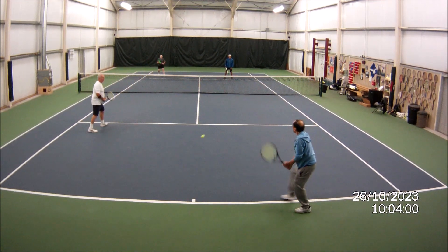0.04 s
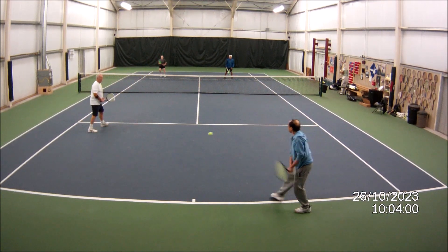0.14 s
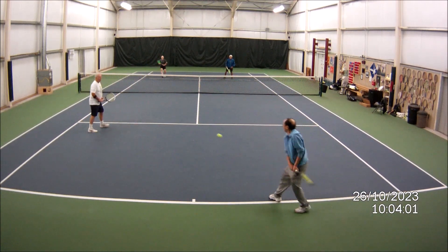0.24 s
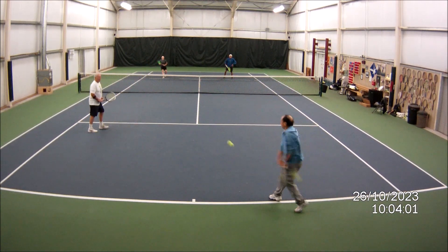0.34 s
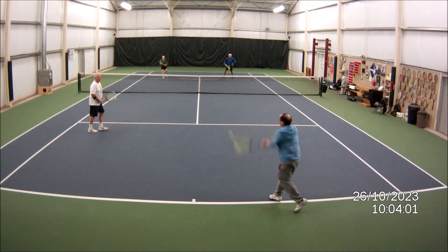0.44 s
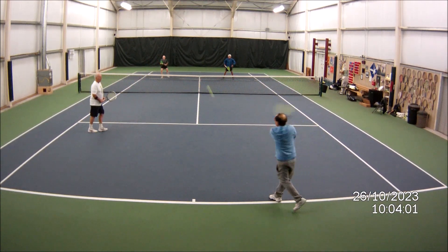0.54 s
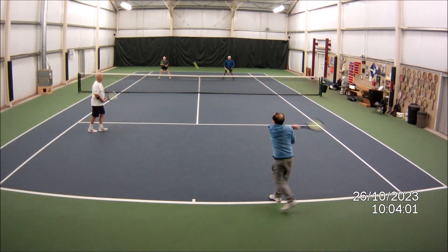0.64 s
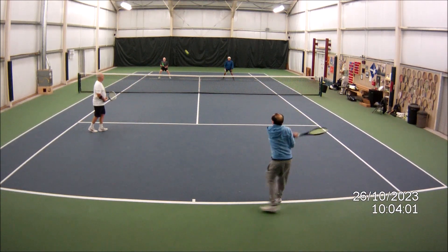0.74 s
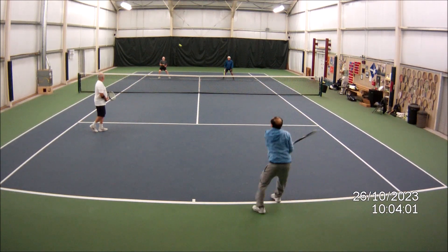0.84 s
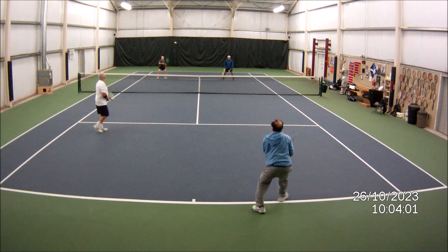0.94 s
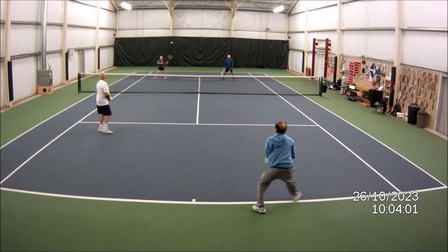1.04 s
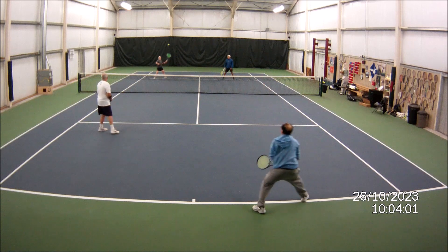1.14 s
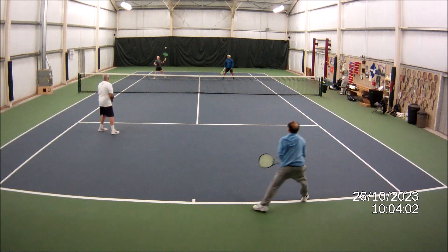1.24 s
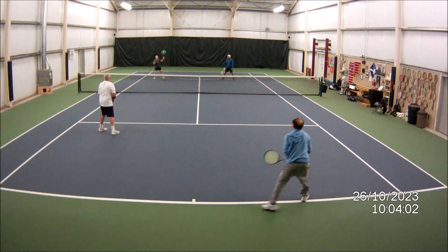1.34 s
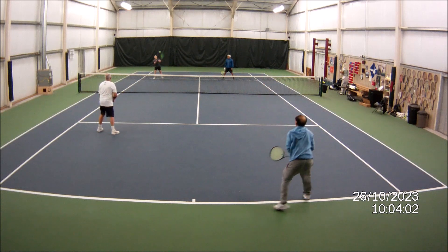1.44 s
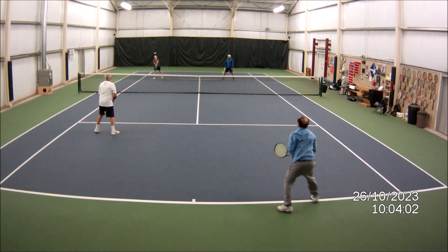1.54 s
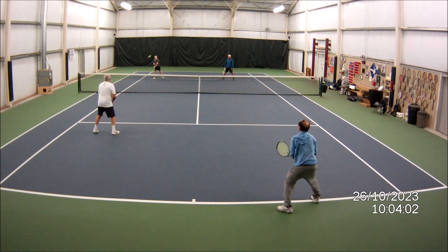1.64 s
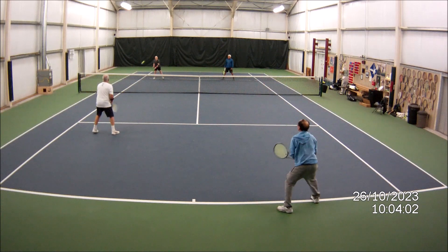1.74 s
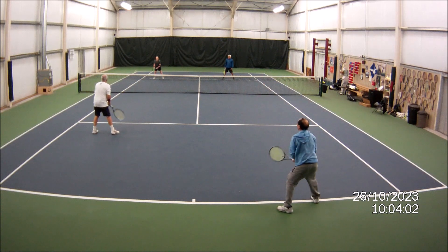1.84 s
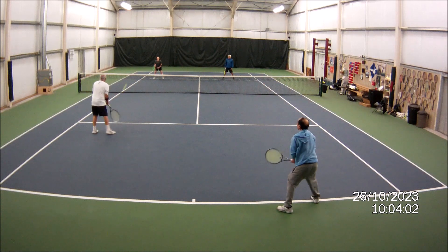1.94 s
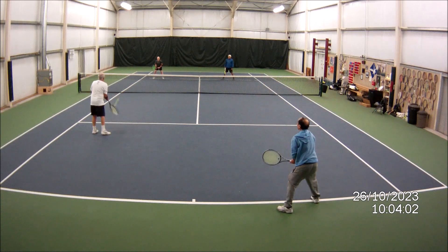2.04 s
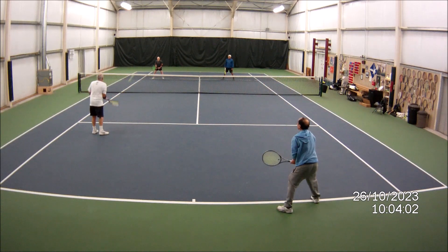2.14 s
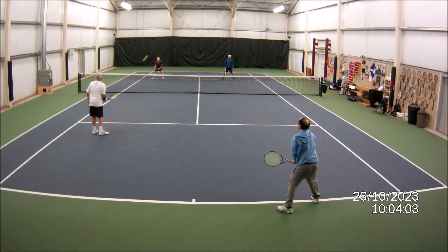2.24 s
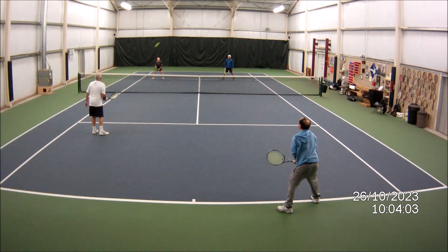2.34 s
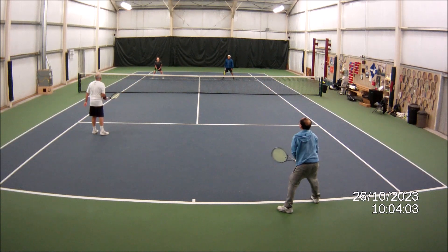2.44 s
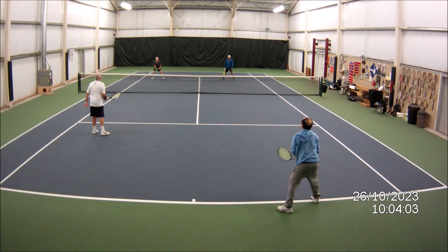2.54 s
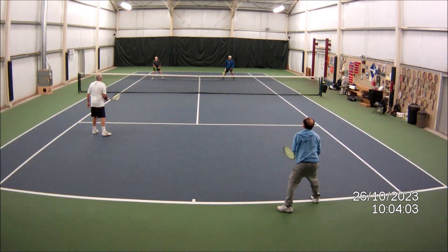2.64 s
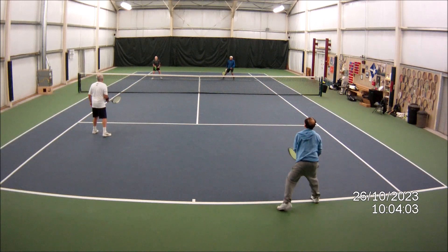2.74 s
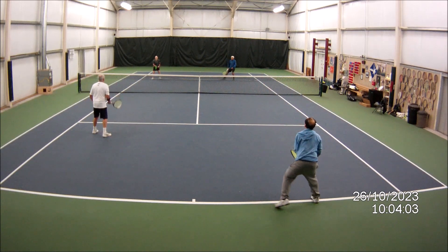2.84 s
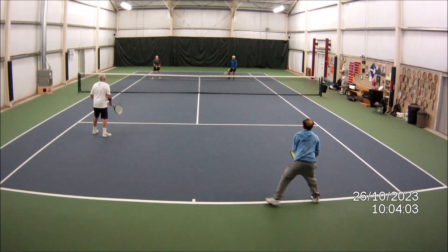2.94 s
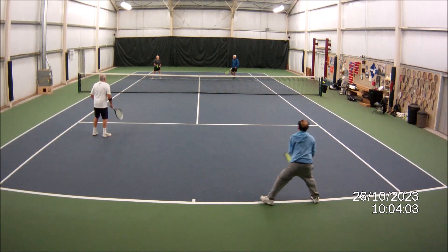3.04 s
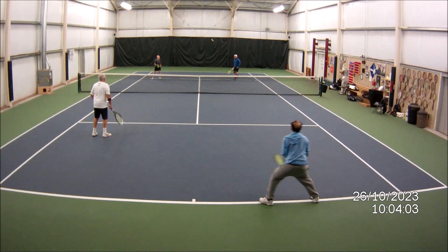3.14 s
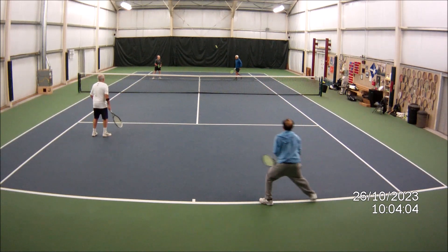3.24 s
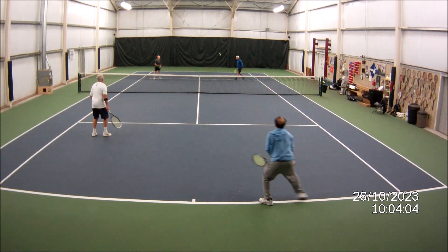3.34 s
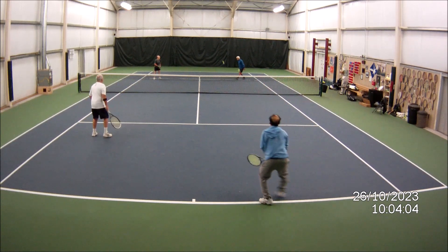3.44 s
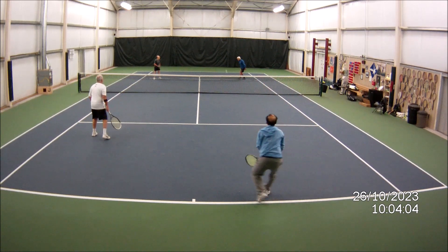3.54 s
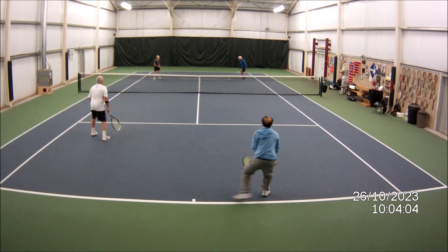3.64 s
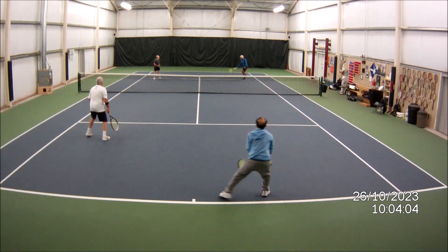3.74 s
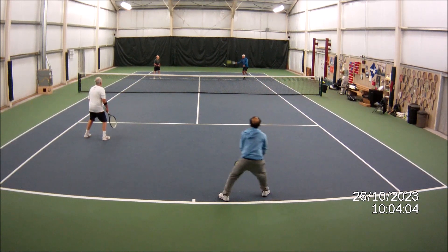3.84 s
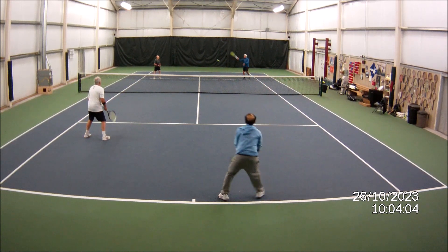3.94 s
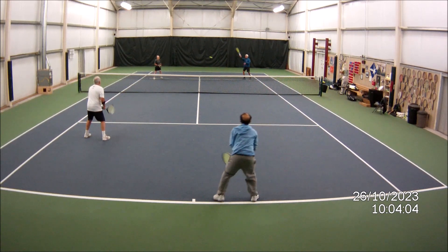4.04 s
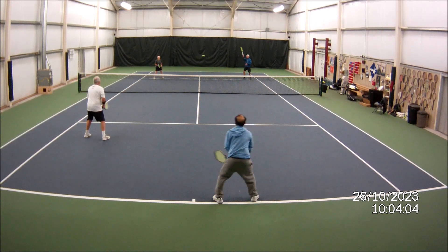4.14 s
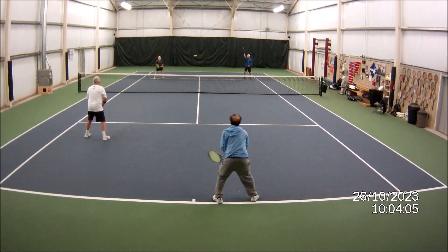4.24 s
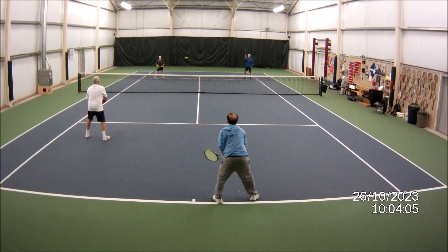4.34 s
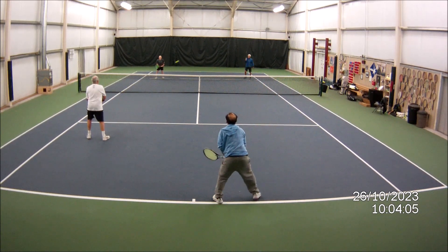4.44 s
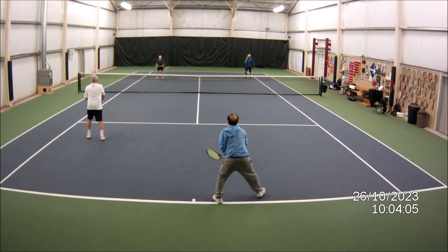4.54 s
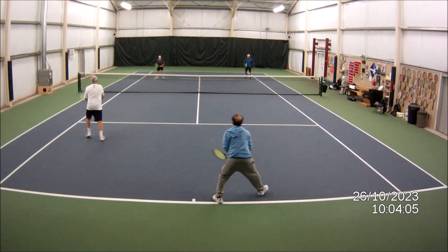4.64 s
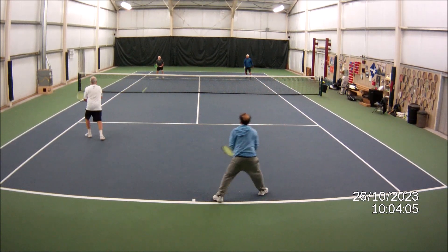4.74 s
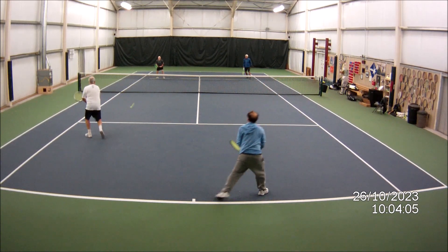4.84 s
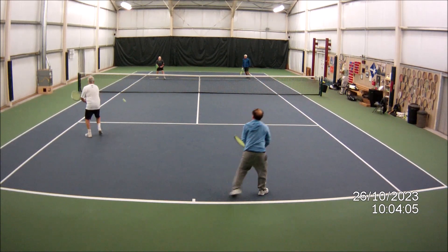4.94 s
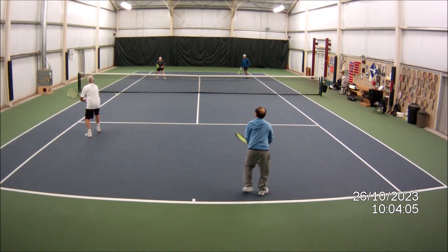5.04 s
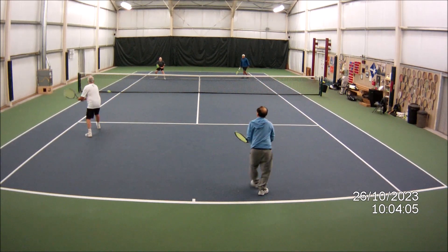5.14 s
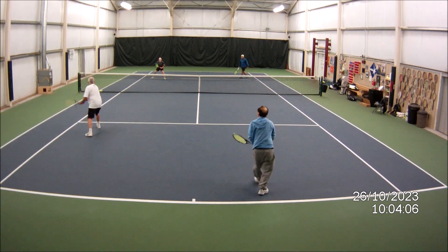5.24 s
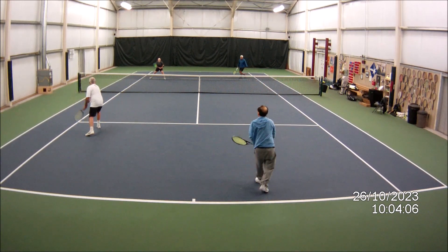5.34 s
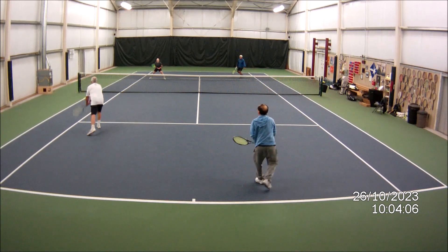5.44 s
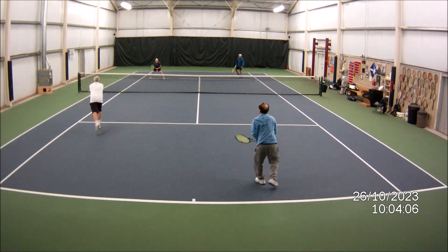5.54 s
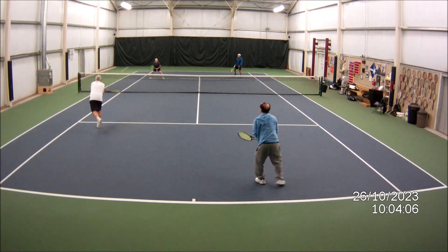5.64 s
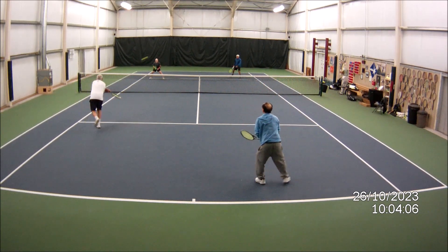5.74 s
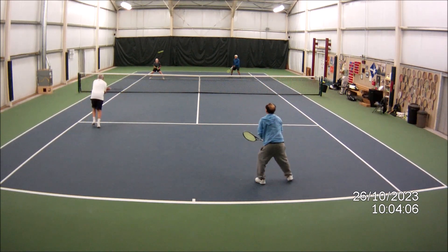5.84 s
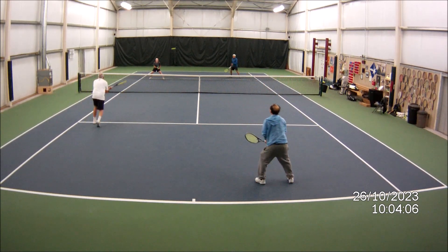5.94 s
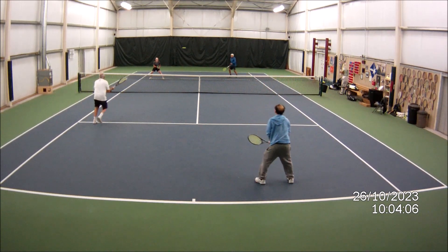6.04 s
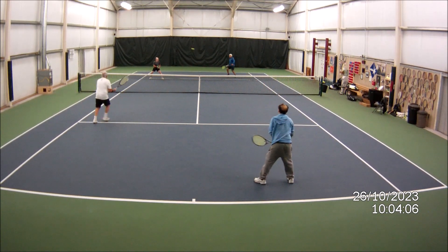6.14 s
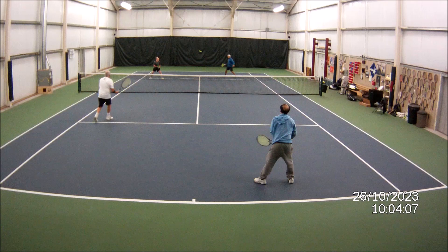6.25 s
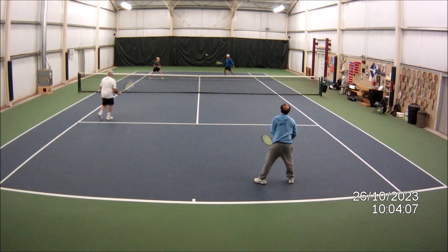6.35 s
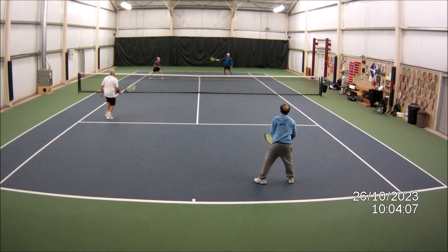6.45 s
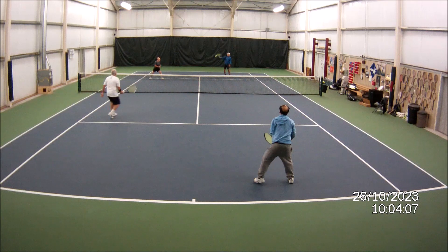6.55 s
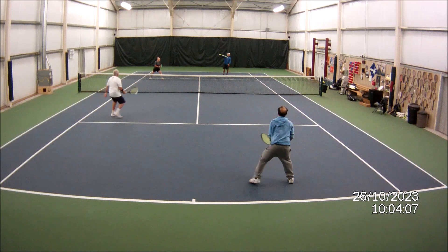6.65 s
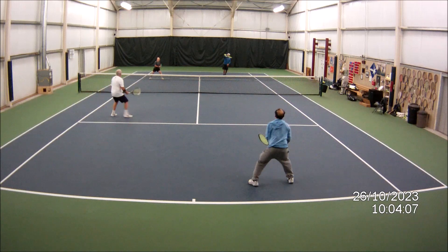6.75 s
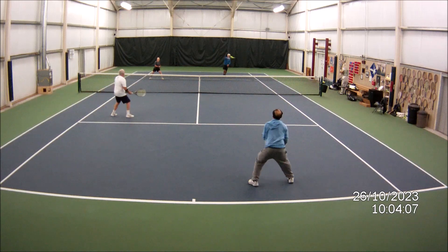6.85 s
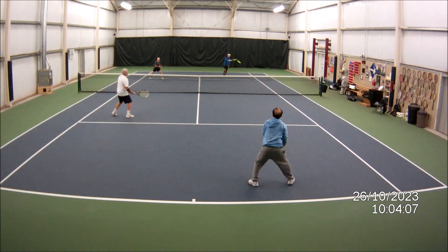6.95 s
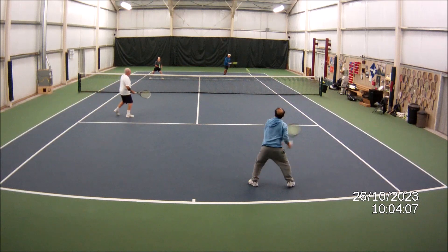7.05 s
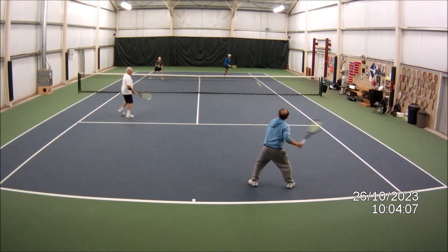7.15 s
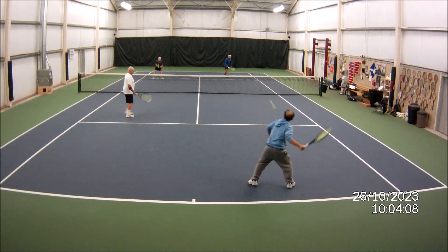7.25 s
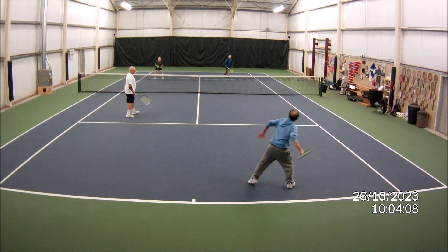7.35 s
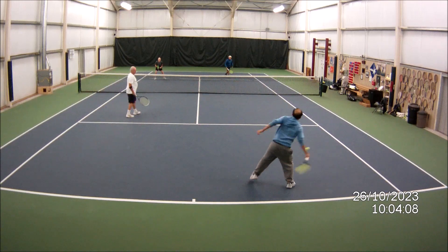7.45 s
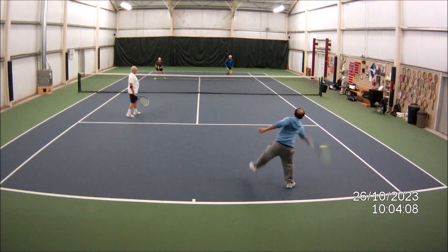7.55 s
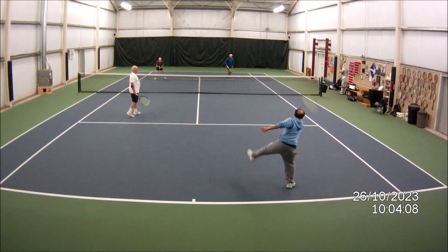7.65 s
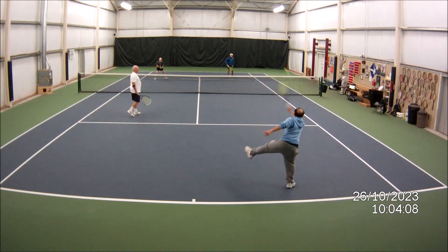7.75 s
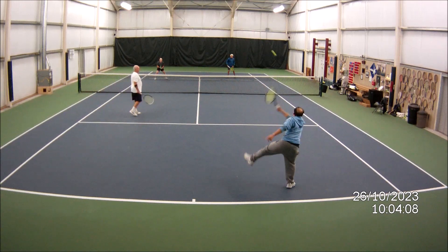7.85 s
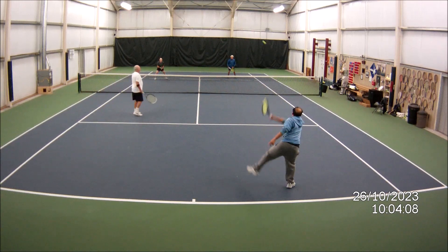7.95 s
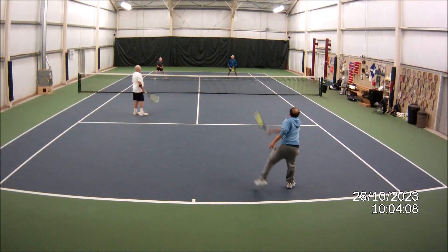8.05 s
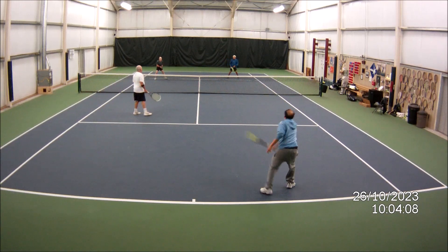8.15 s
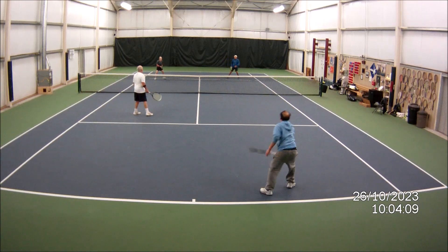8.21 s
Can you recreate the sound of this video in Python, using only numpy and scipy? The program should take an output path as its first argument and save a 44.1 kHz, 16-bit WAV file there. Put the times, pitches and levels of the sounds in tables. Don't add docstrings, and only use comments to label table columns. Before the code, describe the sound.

Tennis balls crack off racquets and pock on a hard indoor court, with shoe squeaks, gritty scuffs and long ringing hall echoes.

```python
import sys
import numpy as np
from scipy import signal
from scipy.fft import rfft, irfft
from scipy.io import wavfile
from scipy.ndimage import uniform_filter1d

SR = 44100
rng = np.random.default_rng(int(sys.argv[2]) if len(sys.argv) > 2 else 0)


def materialize(psi):
    bounded = np.clip(np.atleast_2d(psi).T, -1, 1)
    quanta = np.round(bounded * 32767).astype(np.int16)
    wavfile.write(sys.argv[1], SR, quanta)


def convert_level_to_amplitude(level_db):
    exponent = np.asarray(level_db, float) / 20
    return 10 ** exponent


N = 365148
T = np.arange(N) / SR


def colour(x, points):
    hz, db = np.transpose(points)
    f = np.fft.rfftfreq(x.shape[-1], 1 / SR) + 1
    gain = convert_level_to_amplitude(np.interp(np.log(f), np.log(hz), db))
    y = irfft(rfft(x) * gain, x.shape[-1])
    return y / np.sqrt(np.mean(y ** 2))


def band(x, lo_hz, hi_hz):
    return signal.sosfilt(signal.butter(2, [lo_hz, hi_hz], "band", fs=SR, output="sos"), x)


def decay(t, t60):
    return np.exp(-np.log(1000) * t / t60)


def ring(hz, t60):
    t = T[:4096]
    return np.sin(2 * np.pi * hz * t) * decay(t, t60)


def peak(x, db):
    return convert_level_to_amplitude(db) * x / np.abs(x).max()


def add(out, x, s):
    i = int(s * SR)
    out[i:i + len(x)] += x[:len(out) - i]


def smooth_noise(size):
    return uniform_filter1d(rng.standard_normal(N), size=size) * size ** .5


# [f/Hz, level/dB per Hz]
AIR_COLOUR = [(15, -30.5), (25, -51), (61, -13), (107, -18), (246, -3.5), (495, -14.5), (1020, -8),
              (1270, -15), (1410, -8.5), (1750, -10), (2120, -8), (3090, -10), (6210, -4), (9300, -17),
              (15500, -19.5)]
# [f/Hz, level/dB]
LAMP_TONES = [(59.1, -103), (60.7, -81.5), (120, -90), (179.5, -82.5)]


def background():
    hum = sum(convert_level_to_amplitude(db) * 2 ** .5 * np.sin(2 * np.pi * hz * T + 4.15) for hz, db in LAMP_TONES)
    return convert_level_to_amplitude(-61) * colour(rng.standard_normal(N), AIR_COLOUR) + hum


# [t/s, fade/s, hiss level/dB, top level/dB re hiss, body level/dB re hiss]
STEPS = [(0, .02, -46.5, -15, 4), (0.055, 0.083, -48.5, -11, -7), (0.78, 0.013, -25, -20, -10),
         (0.816, 0.037, -35, -30, -15), (1.112, 0.049, -41, -17.5, -13.5), (3.452, 0.011, -56, -18, -13),
         (3.494, 0.033, -42, -16, -11.5), (3.911, 0.13, -36.5, -24, -14), (3.975, 0.026, -39.5, -16, -5),
         (4.028, 0.024, -42, -15, -12.5), (4.378, .07, -43, -18, -17), (4.615, 0.018, -51, -22, -15),
         (4.521, 0.09, -46.5, -18, -11.5), (4.717, 0.027, -41.5, -21, -17), (4.853, 0.057, -47, -7, -5),
         (4.978, 0.054, -47, -12, -26), (5.21, .015, -49.5, -9, -28), (5.255, 0.01, -53, -9, -14),
         (5.68, 0.13, -39, -25, -19), (5.921, 0.093, -36, -16, -10.5), (8.085, 0.015, -43, -7, -11)]
# [t/s, length/s, hiss level/dB, top level/dB re hiss, body level/dB re hiss]
SLIDES = [(0.764, 0.0086, -25, -17, -18), (1.253, 0.12, -48.5, -10, -17.5), (1.474, 0.043, -39.5, -15, -8),
          (1.858, 0.22, -44, -15, -24), (2.722, 0.13, -56.5, -22, -11), (2.97, 0.153, -53.5, -14, -13),
          (3.131, .045, -56, -16, -17), (3.178, 0.12, -50.5, -20, -10.5), (3.276, 0.18, -47.5, -7.5, -23),
          (3.497, 0.059, -44.5, -14, -19), (3.707, 0.08, -46.5, -8, -4.5), (3.774, .1, -62, -21, 7),
          (3.88, 0.041, -50, -18, -20), (4.805, .045, -51.5, -7.5, -18), (5.4, .077, -48.5, -10.5, -31),
          (6.17, 0.056, -39, -20, -15), (6.723, 0.066, -44, -12.5, -18), (6.99, 0.037, -45, -20, -14),
          (7.29, 0.093, -58.5, -8, -13), (7.916, 0.06, -41.5, -26, -15.5), (8.25, 0.056, -72, -20, 7)]


def contact(column):
    attack_share, fade_db = 0.094, -21.5
    slide_attack_s, slide_release_s = 0.019, 0.031
    out = np.zeros(N)
    t = T[:SR // 2]
    for s, fade, *db in STEPS:
        level_db = db[0] + (db[column] if column else 0)
        attack_s = attack_share * fade
        rise = np.minimum(t / attack_s, 1)
        fall_db = fade_db * np.maximum(t - attack_s, 0) / fade
        add(out, rise * convert_level_to_amplitude(level_db + fall_db), s)
    for s, hold, *db in SLIDES:
        level_db = db[0] + (db[column] if column else 0)
        rise = np.minimum(t / slide_attack_s, 1)
        fall = decay(np.maximum(t - hold, 0), slide_release_s)
        add(out, rise * convert_level_to_amplitude(level_db) * fall, s)
    return out


# [f/Hz, level/dB per Hz]
GRIT_COLOUR = [(1500, -51), (2500, -9), (3500, 1.5), (4500, 3), (6300, 7.5), (8000, -0.5), (10000, -17),
               (13000, -44)]


def scuffs():
    top_colour = [(7000, -11), (9500, 7.5), (14500, -3.5), (16000, -46)]
    body_colour = [(600, -12.5), (1500, -2.0), (2800, 2.5), (3600, -8.5), (4600, -30)]
    grit = rng.standard_normal((3, N)) * convert_level_to_amplitude(1.75 * smooth_noise(150))
    hiss = contact(column=0) * colour(grit[0], GRIT_COLOUR)
    top = contact(column=1) * colour(grit[1], top_colour)
    body = contact(column=2) * colour(grit[2], body_colour)
    return convert_level_to_amplitude(-1.5) * (hiss + top + body)


# [f/Hz, t60/s, level/dB]
HALL_RING = [(129, 3, -14), (255, 0.79, 2.5), (394, 0.95, -2), (520, 1.1, -18.5), (760, 1.46, -8),
             (1280, 1.13, -2), (2030, 1.16, -5), (3200, 1.14, -3), (5270, 1.49, -3.5), (6260, 1.22, -2),
             (9600, 1.15, -3.5), (12600, 1.07, -6)]


def hall(x):
    f, s, cells = signal.stft(rng.standard_normal(2 * SR), SR, nperseg=512)
    hz, t60, db = np.transpose(HALL_RING)
    t60, db = (np.interp(np.log(f + 1), np.log(hz), c)[:, None] for c in (t60, db))
    tail = signal.istft(cells * convert_level_to_amplitude(db) * decay(s, t60), SR, nperseg=512)[1]
    t = T[:len(tail)]
    build_up = np.clip((t - .01) / 0.012, 0, 1)
    early_cloud = 1 + 2.06 * np.exp(-t / 0.016)
    return signal.fftconvolve(x, convert_level_to_amplitude(-37) * build_up * early_cloud * tail)[:N]


# [t/s, peak level/dB]
THUMPS = [(0.048, -59), (0.345, -46.5), (0.407, -33.5), (0.442, -34), (1.385, -34.5), (2.025, -32),
          (3.655, -52), (3.72, -49), (3.78, -48.5), (4.711, -66), (4.856, -45.5), (5.484, -37.5),
          (5.923, -56), (6.473, -40), (7.385, -41), (7.554, -33), (7.572, -29), (7.589, -42),
          (8.088, -45.5)]


def thumps():
    out = np.zeros(N)
    body = band(ring(394, 0.011) + 0.54 * ring(351, 0.019), 161, 600)
    for s, db in THUMPS:
        add(out, peak(body, db), s)
    return out


# [t/s, crack level/dB, ball shell level/dB re crack, upper ring level/dB re crack, upper ring f/Hz]
BOUNCES = [
    (.083, -33.5, -5, -3.5, 1390),
    (0.3462, -33.5, -3, -11, 1400),
    (3.6535, -35, -6.5, -4.5, 1550),
    (3.7689, -21, -48, -13.5, 1590),
    (4.7153, -32.5, -18.5, -16, 1900),
    (4.8562, -41.5, -5, 8, 1470),
    (7.1158, -52.5, 9, 15.5, 1480),
    (7.385, -26, -14.5, -5.5, 1710),
    (7.8585, -27, -23, -26, 1500),
    (8.087, -27, -13.5, -16, 1751),
]
# [t/s, crack level/dB, ball shell level/dB re crack, strings level/dB re crack, strings f/Hz]
STROKES = [
    (0.4087, -1, -14, -13, 1730),
    (1.3791, -13.5, -7.5, -11, 1390),
    (2.0263, -11.5, -16, -25, 1600),
    (5.4813, -11, -17, -13.5, 1516),
    (6.4741, -12.5, -19, -10, 1514),
    (7.5542, -7, -18, -16.5, 1770),
]
STROKE_HALL_DB = [-6.5, 3.5, -1.5, -1, 6.5, -3]
# [hit t/s, spacing/s, low level/dB re hit, crack level/dB re hit]
FLUTTERS = [(.4088, 0.019, -18, -47), (1.3788, 0.016, -0.5, -19), (2.0257, 0.014, -12, -24),
            (4.8565, .0155, -30, -28), (5.4815, 0.015, -18, -19.5), (6.4741, 0.015, 6.5, -17),
            (7.1164, .0135, 0.5, -15), (7.385, 0.014, -17, -19), (7.5545, 0.015, -2, -22)]
# [low level/dB, crack level/dB]
TOSSES = [(4, 4.5), (11, 3), (1, -5), (6, -17.5)]


def blows():
    strokes = [(*row, row[1] + hall_db) for row, hall_db in zip(STROKES, STROKE_HALL_DB)]
    bounces = [(*row, row[1] + 1.5) for row in BOUNCES]
    slaps = []
    for s, gap, low_db, crack_db in FLUTTERS:
        for k, (toss_low_db, toss_crack_db) in enumerate(TOSSES):
            slaps.append((s + (k + 1) * gap, low_db + toss_low_db, crack_db + toss_crack_db))
    return sorted(strokes + bounces), slaps


# [f/Hz, level/dB per Hz]
CRACK_COLOUR = [(300, -8), (900, -3), (1500, -3.5), (2400, -2.5), (3200, -0.5), (4500, 2), (6500, 3.5),
                (9000, -10.5), (13000, -24.5), (15500, -30)]
# [f/Hz, level/dB, t60/s]
BALL_SHELL = [(842, 13.5, 0.052), (990, 22, 0.031), (1220, -21, 0.0153), (2430, -17, 0.0155)]


def hits():
    t = T[:4096]
    direct, feed = np.zeros((2, N))
    rows, slaps = blows()
    noise = rng.standard_normal((len(rows), 3, len(t)))
    shell = sum(convert_level_to_amplitude(db) * ring(hz, t60) for hz, db, t60 in BALL_SHELL)
    snap = colour(1. * (np.arange(len(t)) == 256), CRACK_COLOUR)
    burst = np.minimum(t / 0.0012, 1) / (1 + (t / 0.0076) ** 4)
    for k, (s, db, shell_db, strings_db, hz, hall_db) in enumerate(rows):
        ball = peak(shell, shell_db)
        modes = ball + peak(ring(hz, .02), strings_db)
        spread = ball + peak(ring(hz, .009), strings_db + 0.5)
        knocks = (t == t[64])[:256] + 0.078 * (burst * noise[k, 1])[:256]
        pock = convert_level_to_amplitude(db) * np.convolve(knocks / np.linalg.norm(knocks), modes)[:len(t)]
        crack = convert_level_to_amplitude(db - 14.5) * burst * colour(noise[k, 0], CRACK_COLOUR)
        add(direct, crack + pock, s)
        add(feed, convert_level_to_amplitude(hall_db) * (convert_level_to_amplitude(-22) * snap + convert_level_to_amplitude(1.0) * spread), s)
        after = rows[k + 1][0] if k + 1 < len(rows) else N
        for at, low_db, crack_db in slaps:
            if s < at < after:
                scattered = colour(np.roll(noise[k, 2], int(at * SR)), CRACK_COLOUR)
                slap = convert_level_to_amplitude(db - 5.5 + crack_db) * burst * scattered
                add(direct, convert_level_to_amplitude(low_db - 20) * pock + slap, at)
    return direct, feed


# [t/s, peak level/dB, f/Hz]
RETURNS = [(0.581, -30, 930), (0.611, -36, 786), (0.637, -36.5, 869), (1.352, -45, 895), (1.585, -35, 1040),
           (1.649, -47, 800), (2.171, -35.5, 760), (2.232, -44, 875), (3.622, -53, 810), (3.716, -45, 860),
           (3.832, -43.5, 840), (5.272, -52, 780), (5.624, -38.5, 1140), (6.281, -48, 900),
           (6.679, -39, 835), (6.733, -34.5, 1020), (7.0, -48, 850), (7.72, -33.5, 1061)]


def end_walls():
    round_trip_s, loss_db = .2026, -8
    out = np.zeros(N)
    for s, db, hz in RETURNS:
        pock = band(ring(hz, 0.024) + 0.62 * ring(2.05 * hz, 0.022), 610, 2300)
        for trip in range(4):
            add(out, peak(pock, db + trip * loss_db), min(s + trip * round_trip_s, N / SR))
    return out


# [t/s, length/s, slip rate f/Hz, first partial level/dB, second partial level/dB]
SQUEAKS = [
    (0.609, 0.022, 3185, -18.5, -20.5),
    (0.662, .032, 3107, -26, -30.5),
    (.672, .018, 2830, -60, -32),
    (6.188, 0.04, 3220, -51, -68),
    (7.876, 0.043, 3010, -31.5, -32.5),
]
SQUEAK_HALL_DB = [3, -6, -14, -2, 4]


def squeaks():
    rise_hz_per_s = 1520
    ends_db, crest = -5, .6
    direct, feed = np.zeros((2, N))
    shake = 1 + .012 * smooth_noise(60)
    grip = convert_level_to_amplitude(2 * uniform_filter1d(smooth_noise(90), size=60))
    for (s, length, hz, db, second_db), hall_db in zip(SQUEAKS, SQUEAK_HALL_DB):
        load = np.clip((T - s) / length, 0, 1)
        slip_hz = (hz + rise_hz_per_s * length * load) * shake
        phase = 2 * np.pi * np.cumsum(slip_hz) / SR
        edge = np.clip(np.minimum(T - s, s + length - T) / 0.0014, 0, 1)
        pressure = edge * convert_level_to_amplitude(ends_db * ((load - crest) / crest) ** 2)
        first = convert_level_to_amplitude(db) * np.sin(phase)
        upper = convert_level_to_amplitude(second_db) * (np.sin(2 * phase) + convert_level_to_amplitude(-26) * np.sin(3 * phase))
        tone = 2 ** .5 * pressure * (first + upper) * grip
        direct += tone
        feed += convert_level_to_amplitude(hall_db) * tone
    return direct, feed


def scene():
    hit, hit_feed = (band(x, 222, 20000) for x in hits())
    low, drag = thumps(), scuffs()
    squeal, squeal_feed = squeaks()
    wet = hall(hit_feed + convert_level_to_amplitude(2.5) * low + convert_level_to_amplitude(1.5) * drag + squeal_feed)
    drag = drag + .4 * np.roll(drag, int(.0013 * SR))
    mono = hit + low + drag + squeal + end_walls() + wet + background()
    return np.tile(mono, (2, 1))


def low_pass(x):
    return signal.sosfilt(signal.butter(12, 16500, fs=SR, output="sos"), x)


def record(dry):
    shelf = signal.ellip(6, .3, 26, 15300, fs=SR, output="sos")
    fizz_colour = [(2500, -36), (6000, -10.5), (12000, -1), (15000, -10), (16000, -53)]
    loud = uniform_filter1d(np.abs(band(dry[0], 14400, 16100)), size=1024)
    fizz = convert_level_to_amplitude(-6) * loud * colour(rng.standard_normal(N), fizz_colour)
    mix = signal.sosfilt(shelf, dry + fizz * np.array([[1], [-1]]))
    return low_pass(mix)


dry = scene()
out = record(dry)
materialize(out)
```